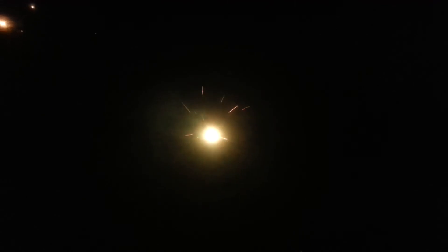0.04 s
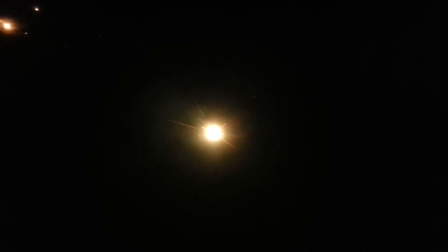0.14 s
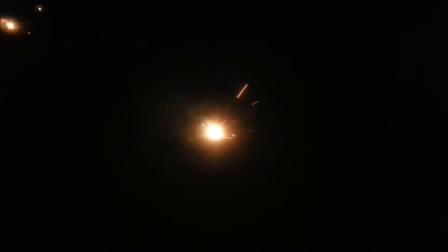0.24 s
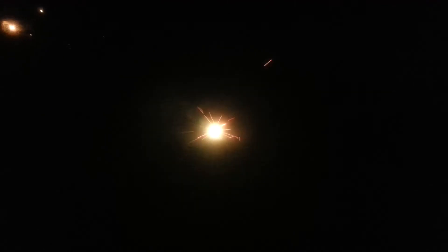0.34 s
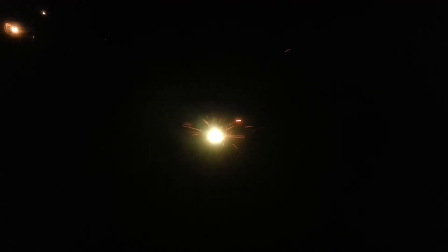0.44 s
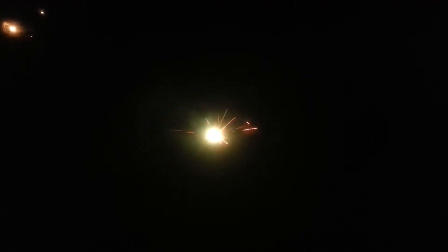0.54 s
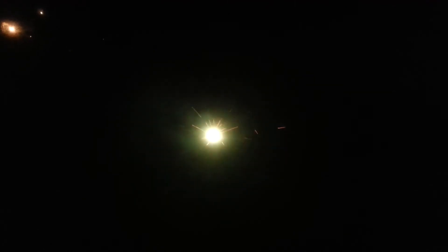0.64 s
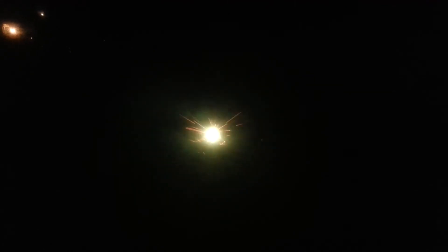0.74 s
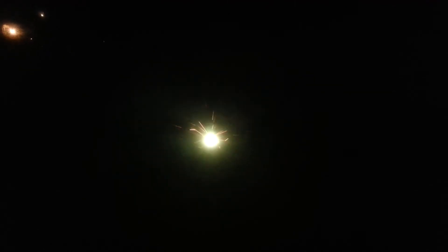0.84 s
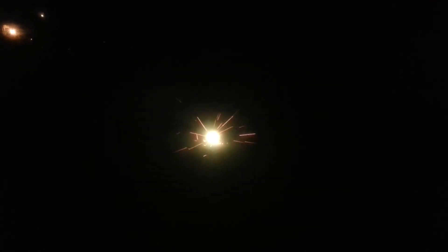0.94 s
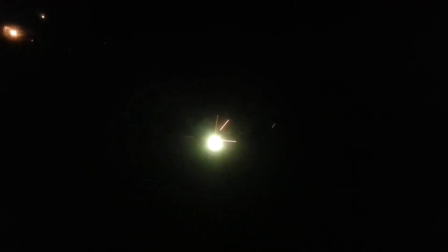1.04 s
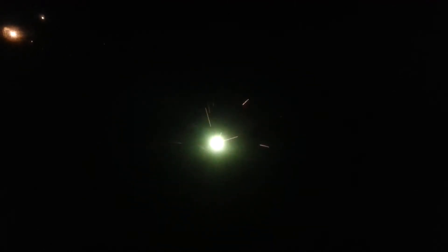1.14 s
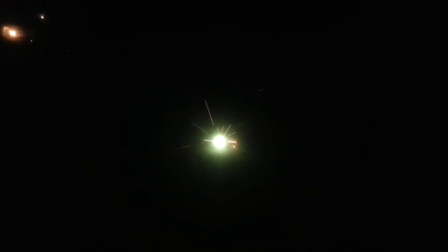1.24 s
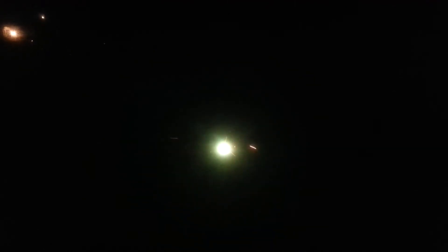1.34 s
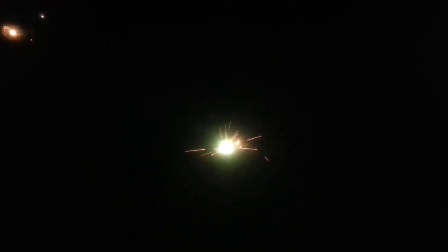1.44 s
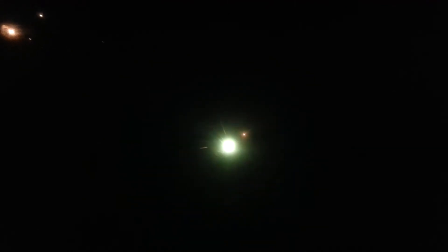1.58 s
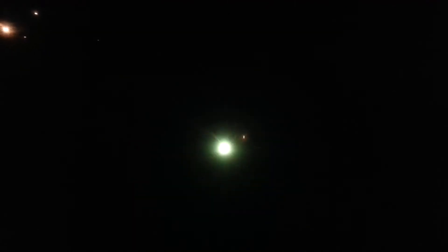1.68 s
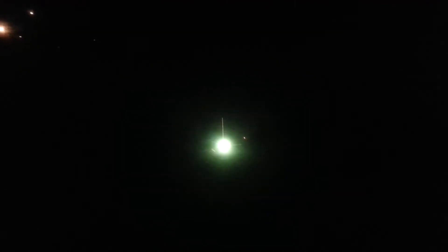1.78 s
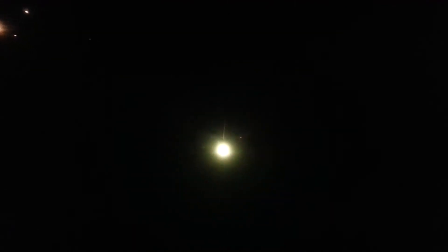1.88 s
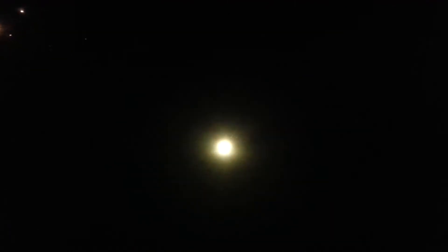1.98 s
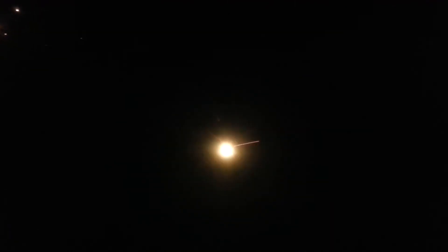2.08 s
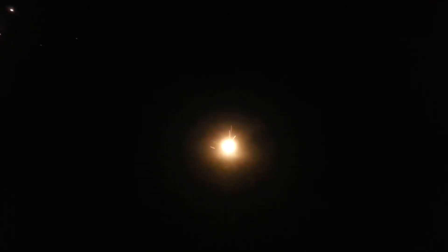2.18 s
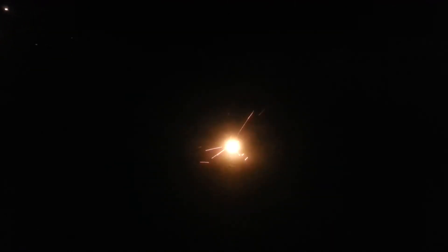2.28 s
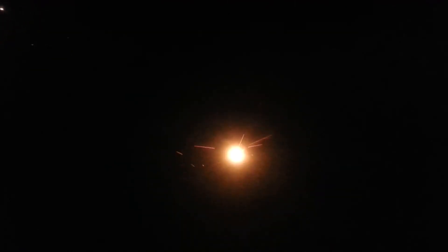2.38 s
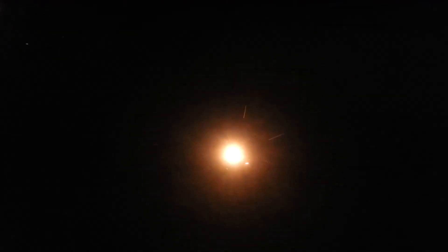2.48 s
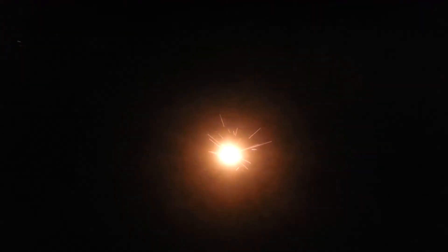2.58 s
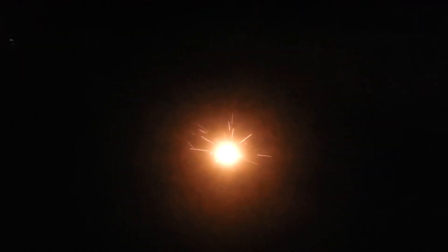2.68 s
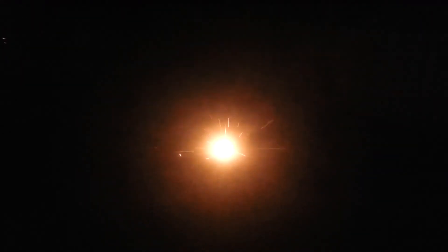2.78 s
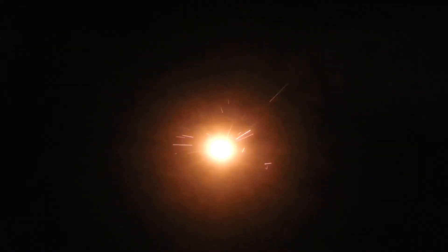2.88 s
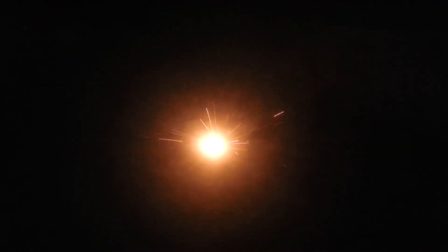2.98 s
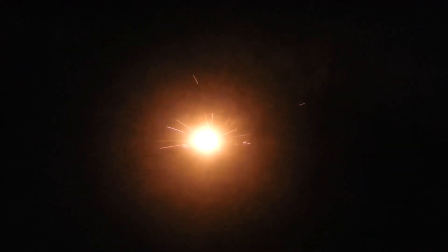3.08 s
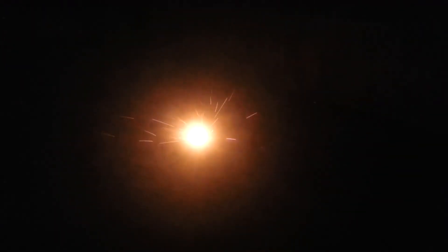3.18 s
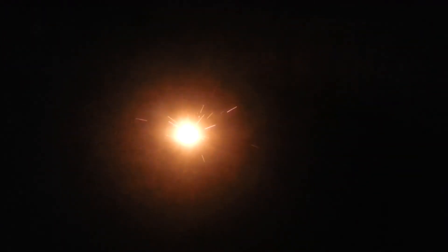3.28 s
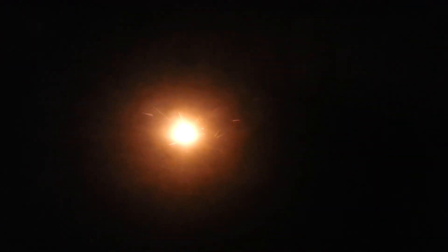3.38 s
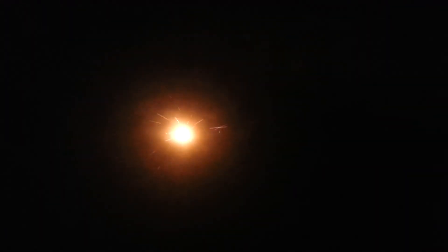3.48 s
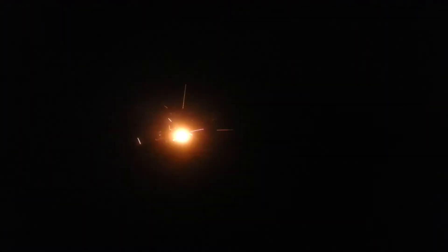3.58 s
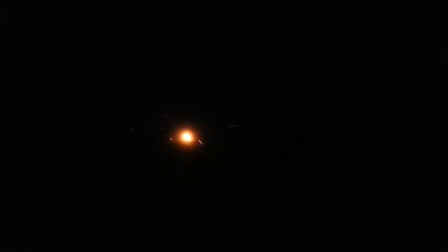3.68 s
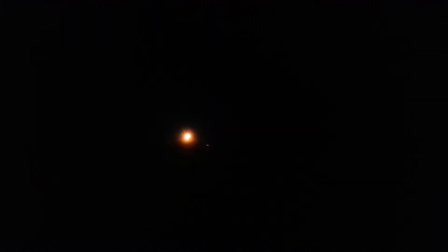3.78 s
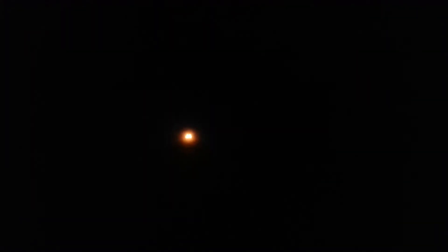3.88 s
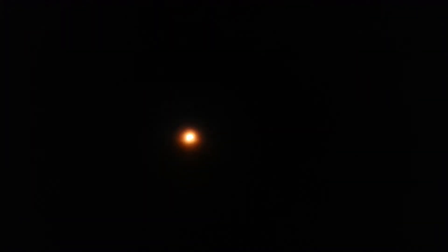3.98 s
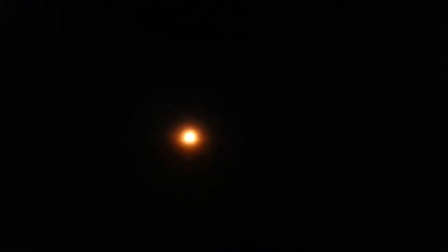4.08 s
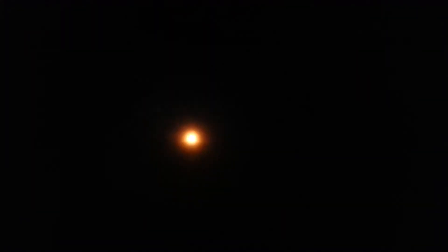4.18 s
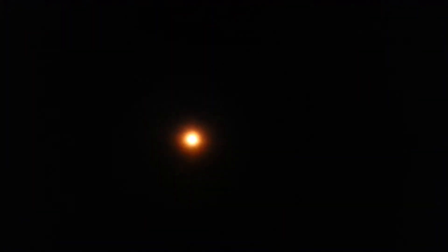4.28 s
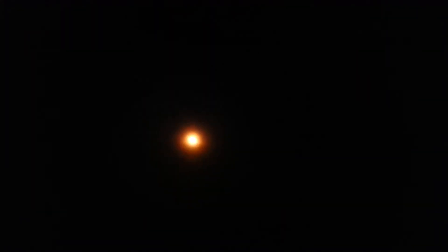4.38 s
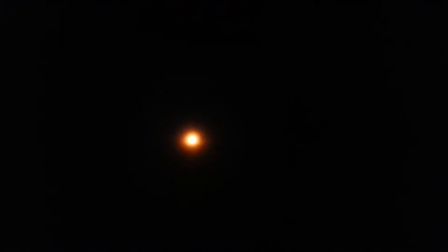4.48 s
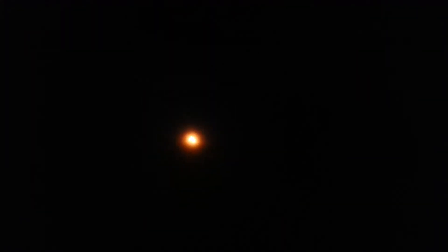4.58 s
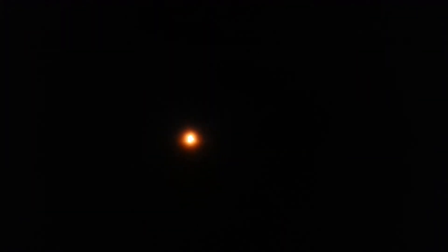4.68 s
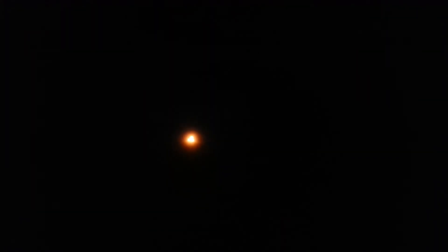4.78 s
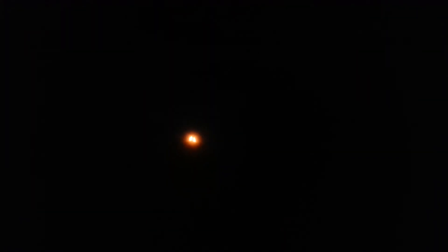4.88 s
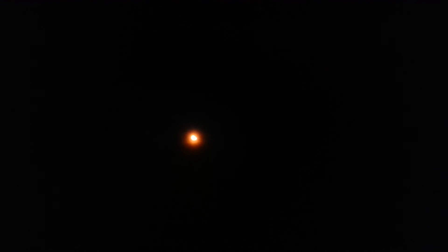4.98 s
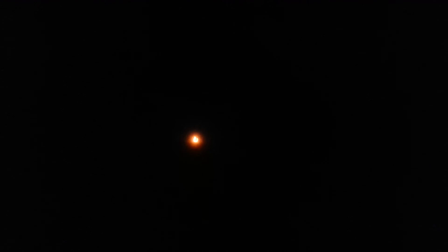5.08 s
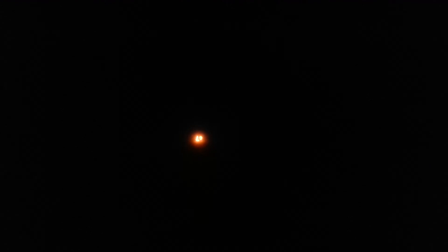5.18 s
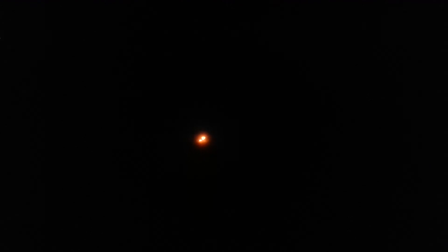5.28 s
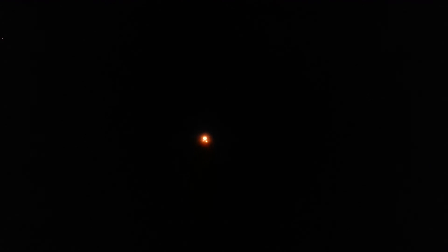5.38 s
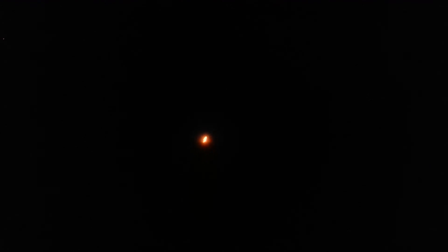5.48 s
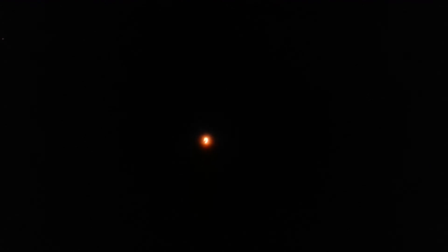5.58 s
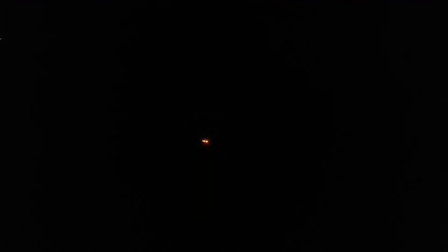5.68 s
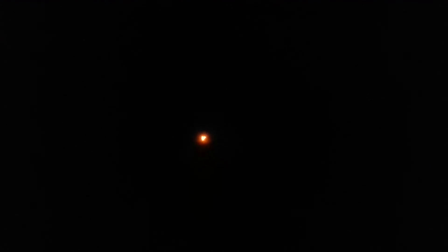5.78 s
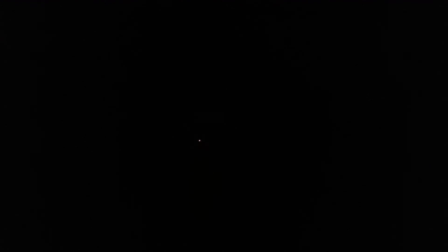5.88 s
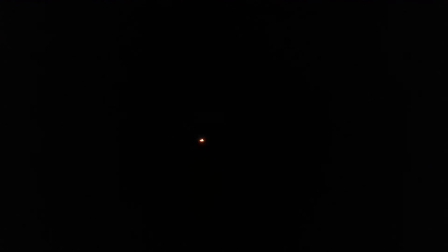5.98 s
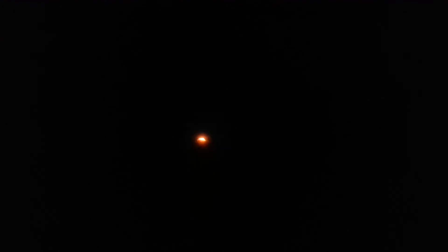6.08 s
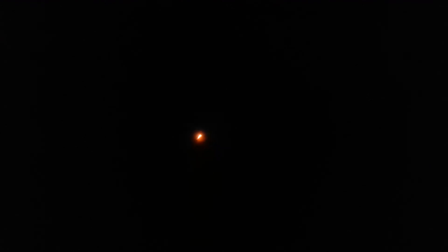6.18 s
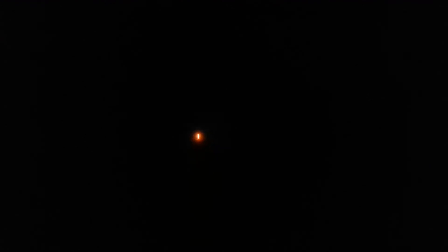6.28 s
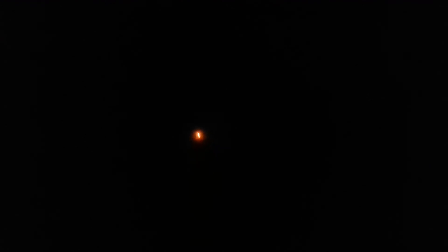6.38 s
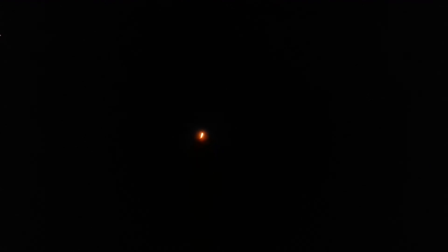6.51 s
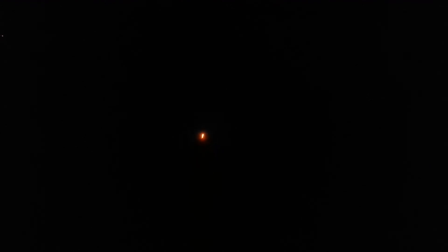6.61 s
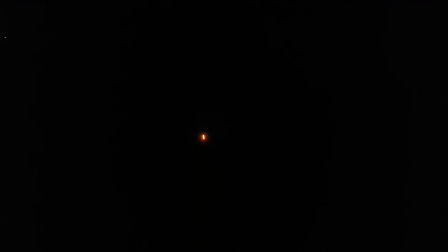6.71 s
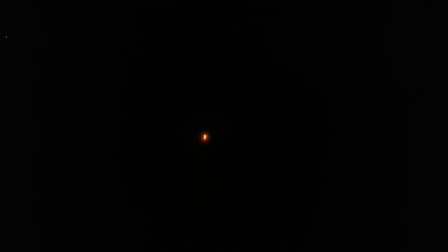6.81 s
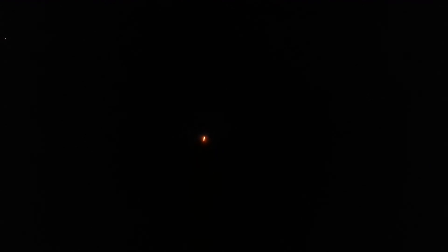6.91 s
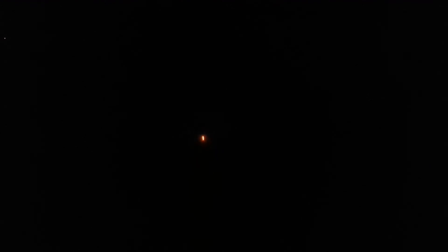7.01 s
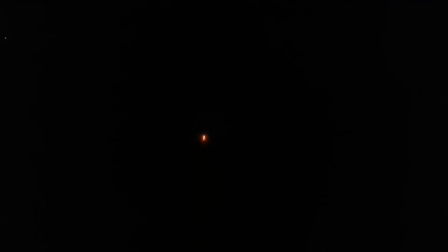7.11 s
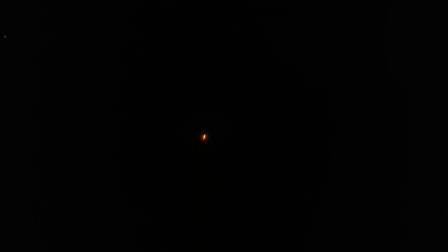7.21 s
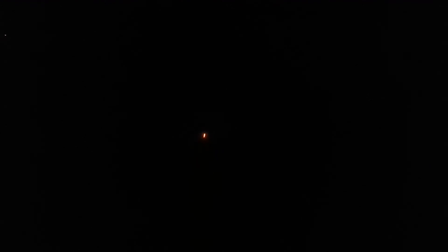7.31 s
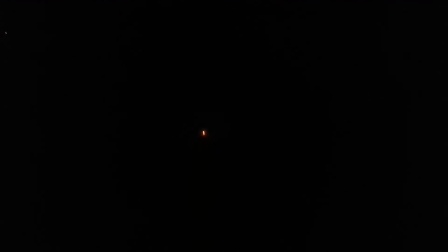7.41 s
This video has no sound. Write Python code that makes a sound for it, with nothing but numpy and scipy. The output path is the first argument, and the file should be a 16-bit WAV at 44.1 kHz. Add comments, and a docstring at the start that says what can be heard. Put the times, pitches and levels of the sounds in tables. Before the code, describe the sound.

A ground firework hisses and sputters nearby at night, surging as shell bursts crack and echo between houses, then chuffs out in single spits.

```python
"""Ground firework at night

A ground firework spins, hisses, surges and flares, then chuffs out in single spits: shaped noise gated by spurts.
Three strong shell bursts and three fainter ones, pressure pulses with scatter, echo between house fronts.
Behind them lie a rumble of distant fireworks (slowly swelling noise) and a faint motor that winds down
(a sine of falling pitch); short sines give three rings of the spits and one hollow knock, impulses two clicks."""
import sys
import numpy as np
from scipy import signal
from scipy.fft import rfft, irfft, next_fast_len
from scipy.io import wavfile
from scipy.ndimage import uniform_filter1d, map_coordinates

SR = 44100
rng = np.random.default_rng(int(sys.argv[2]) if len(sys.argv) > 2 else 0)


def store_wav(level_fs):
    """Save 16-bit WAV to argv[1]."""
    pcm = np.round(np.clip(np.atleast_2d(level_fs), -1, 1) * 32767)
    wavfile.write(sys.argv[1], SR, pcm.T.astype(np.int16))


N = 328538

# Left-right correlation of far sounds: (frequency [Hz], correlation [0-1])
FAR_CORRELATION = [(60, 0.43), (200, 1), (600, 0.59), (1200, .05), (8000, .03)]
# Decay of the short echo between house fronts: (frequency [Hz], time to fall 60 dB [s])
FRONTS_T60 = [(80, 0.243), (250, 0.87), (600, 0.37), (2000, 0.37), (8000, 0.14)]
# The jet swings round unevenly: (time [s], direction [negative turned away, positive facing us])
JET_FACING = [(0, -0.31), (.1, -0.42), (.18, 0.34), (.27, -0.43), (.34, 0.89), (.44, 0.92), (.49, -0.82),
              (.68, -0.79), (.74, 0.7), (.84, 0.36), (.89, -0.83), (.97, 0.34), (1.09, 0.32), (1.15, -0.69),
              (1.21, 0.99), (1.27, -0.6), (1.33, .6), (1.39, -0.44), (1.57, -0.35), (1.67, 0.83),
              (1.75, -0.65), (1.8, .5), (1.89, 1), (1.96, -.6), (2.06, 0.59), (2.15, -0.062), (2.2, 0.56),
              (2.3, -0.67), (2.44, -1.3), (2.51, 0.28), (2.57, -0.75), (2.76, -0.17), (2.81, 0.93),
              (2.89, 0.76), (2.94, -.6), (3.02, -0.06), (3.12, 0.0042)]


def amp(db):
    """Level to amplitude: every 20 dB is a factor of ten."""
    return 10 ** (np.asarray(db) / 20)


def unit(x):
    """Normalization to a root-mean-square of 1."""
    return x / np.sqrt(np.mean(x ** 2) + 1e-20)


def along(points, hz):
    """Interpolation of (frequency [Hz], value) points on a logarithmic frequency axis."""
    f, v = np.transpose(points)
    return np.interp(np.log(hz + 1), np.log(f + 1), v)


def curves(rows):
    """Linear interpolation in time: one value per sample for each column after the time."""
    s, *columns = np.transpose(rows)
    return [np.interp(np.arange(N) / SR, s, column) for column in columns]


def wobble(rate):
    """Slow random modulation: a smooth curve through random knots, rate of them per second."""
    knots = rng.standard_normal(int(N * rate / SR) + 4)
    return map_coordinates(knots, [np.arange(N) * rate / SR])


def swell(start, length, attack, release):
    """Envelope from 0 to 1: a straight rise and a hold, then exponential relaxation."""
    t = np.arange(N) / SR - start
    return np.clip(t / attack, 0, 1) * np.exp(-np.clip((t - length) / release, 0, 20))


def filtered(x, response):
    """Linear filtering: the spectrum of x times a complex response of frequency."""
    size = next_fast_len(N + SR // 2)
    spectrum = rfft(x, size) * response(np.fft.rfftfreq(size, 1 / SR))
    return irfft(spectrum, size)[..., :N]


def pulse(spectrum, size=4096):
    """Minimum phase: the causal pulse of peak 1 with this spectrum, found by folding its cepstrum."""
    cepstrum = irfft(np.log(amp(along(spectrum, np.fft.rfftfreq(size, 1 / SR)))))
    shape = irfft(np.exp(rfft(2 * cepstrum[:size // 2], size)))
    return shape / np.abs(shape).max()


def rush(spectrum, correlation, patchy_db, size=8):
    """Turbulent noise: stereo, rms 1, with random gain patches of size frames in time."""
    noise = rng.standard_normal((2, N), dtype=np.float32)
    z = signal.stft(noise, nperseg=512)[2]
    field = uniform_filter1d(rng.standard_normal(z.shape[1:]), size=6, axis=0)
    field = uniform_filter1d(field, size=size, axis=1)
    patches = amp(patchy_db * unit(field)).astype(np.float32)
    pair = signal.istft(z * patches, nperseg=512)[1][:, :N]

    def mid_side_response(hz):
        likeness = np.clip(along(correlation, hz), -1, 1)
        return amp(along(spectrum, hz)) * np.sqrt(1 + np.outer([1, -1], likeness))

    mid, side = filtered(pair, mid_side_response)
    return unit(np.array([mid + side, mid - side]))


def placed(pair, lead_ms, right_db):
    """Stereo localization: the right microphone hears a source earlier and right_db louder."""
    shift = lead_ms * SR / 1000
    left = map_coordinates(pair[0], [np.arange(N) - shift], order=5)
    return np.array([left * amp(-right_db / 2), pair[1] * amp(right_db / 2)])


def motor():
    """Frequency modulation: a faint hum slides down in pitch as the motor slows, and fades."""
    fast_hz, slow_hz, halfway_s, steepness = 201, 78, 2.37, 3.1
    start_db, fade_db_per_s = -44, 3.5
    stops_s, stop_db_per_s = 3.6, 9  # extra fade from here on
    t = np.arange(N) / SR
    hz = slow_hz + (fast_hz - slow_hz) / (1 + (t / halfway_s) ** steepness)
    phase = 2 * np.pi * np.cumsum(hz * (1 + 0.011 * wobble(9))) / SR
    level_db = start_db - fade_db_per_s * t - stop_db_per_s * np.maximum(t - stops_s, 0)
    return amp(level_db + 2.2 * wobble(8.9)) * np.sin(phase)


def town():
    """Superposition: far fireworks merge into a restless rumble; the microphones hiss."""
    # Spectra of the rumble and its deep part: (frequency [Hz], relative density [dB])
    town_spectrum = [(25, -60), (50, -47.5), (100, -17), (150, -3), (240, -1.5), (335, -2), (400, -6.5),
                     (500, -7), (620, -3.5), (1000, -8), (1400, -16), (2200, -23.5), (5500, -31.5),
                     (14000, -39)]
    deep_spectrum = [(20, -25), (45, -20), (75, -6), (100, -4), (150, -18), (300, -32.5)]
    # (time [s], relative rumble level [dB], relative deep level [dB])
    rumble_levels = [(0, -50, -69), (.8, -42.5, -83), (1.8, -49.5, -96), (2.75, -47.5, -85),
                     (3.1, -43, -62), (4.5, -45, -74), (4.63, -43, -68), (4.78, -45, -66),
                     (5.03, -48, -63.5), (5.45, -43.5, -62.5), (6.02, -46.5, -72), (6.22, -48, -71),
                     (6.6, -47, -66), (7.0, -47, -69.5), (7.45, -48.5, -65)]
    # Far booms swell the rumble: (start [s], length [s], gain [dB])
    rolls = [(5.412, .04, 2), (5.61, 0.15, 1), (6.109, 0.047, 2), (6.205, 0.082, 2.5), (6.968, .08, 1)]
    roll_attack_s, roll_release_s = 0.021, 0.03
    rumble_db, deep_db = curves(rumble_levels)
    for s, length, db in rolls:
        rumble_db = rumble_db + db * swell(s, length, roll_attack_s, roll_release_s)
    rumble = amp(rumble_db + 2.5 + 0.233 * wobble(7.0)) * rush(town_spectrum, FAR_CORRELATION, patchy_db=0.93)
    deep = amp(deep_db + 5.5) * rush(deep_spectrum, FAR_CORRELATION, patchy_db=2.5)
    hiss_spectrum = [(300, 2), (6500, -8.0), (11000, -1.0), (15000, -2.0)]
    hiss = amp(-60.0) * rush(hiss_spectrum, FAR_CORRELATION, patchy_db=-2.0)
    dulled = filtered(rumble, lambda hz: 1 / (1 + (hz / 6000) ** 2))
    return placed(dulled, lead_ms=0.2, right_db=-0.5) + deep + hiss


def ticks():
    """Impulses: two thin clicks in the quiet at the end, through a first-order high-pass."""
    # (time [s], relative level [dB])
    tick_list = [(5.7019, -37.5), (6.9842, -37.5)]
    clicks = np.zeros(N)
    for s, db in tick_list:
        clicks[round(s * SR)] = amp(db + 9.0)
    return filtered(clicks, lambda hz: 1j * hz / (3500 + 1j * hz))


def street(x, decay, build):
    """Reverberation: an echo among houses builds up, then each frequency decays at its own speed."""
    hz, t, z = signal.stft(rng.standard_normal((2, 2 * SR)), SR, nperseg=256)
    turn = np.arccos(np.clip(along(FAR_CORRELATION, hz), -1, 1))[:, None] / 2
    mid, side = z[0] * np.cos(turn), z[1] * np.sin(turn)
    fade = amp(-60 * t / along(decay, hz)[:, None]) * (1 - np.exp(-t / build))
    tail = signal.istft(np.array([mid + side, mid - side]) * fade, SR, nperseg=256)[1]
    return signal.fftconvolve(x, tail / np.linalg.norm(tail[0]), axes=1)[:, :N]


def shells():
    """Specular and diffuse reflection: a pulse and its wall echoes, each with scatter, then the street's tail."""
    # (time [s], relative level [dB], wall echo gain [dB], tail gain [dB], right microphone's lead [ms],
    # echo path factor [-], bass gain [dB], knock gain [dB], treble gain [dB])
    shell_list = [(0.3112, -6.5, -7, -0.5, 0.18, .9, 1.5, 0, 0.5), (.522, -50, -3, -5, .1, 1, 2, 0, 0.5),
                  (2.829, -11, -1, 1.5, 0.22, 1.04, 4, 3, 5.5),
                  (5.079, -17.5, 7, 3.5, 0.27, 1.06, 0.5, -1, -1),
                  (6.8579, -30, -13, -3, 0.18, 1, 6, -3, -6), (6.892, -34, -14, -7, .14, 1, 4, 0, -6)]
    # House fronts repeat every burst: (delay at path factor 1 [ms], relative level [dB])
    walls = [(4.8, -2), (13, 4), (18.5, -4.5), (28.5, -8), (58, -25.5), (96, -10)]
    # Spectrum of the pressure pulse: (frequency [Hz], relative level [dB])
    boom_spectrum = [(25, -47.5), (60, -26), (110, -9), (150, -2.5), (240, 1.5), (300, 0.5), (365, -2),
                     (470, -6.5), (620, 0.5), (720, -2.5), (880, -10.5), (1100, -7), (1450, -15.5),
                     (1900, -16.5), (2800, -29), (4000, -45), (8000, -68.5)]
    # Decay of the long echo down the street: (frequency [Hz], time to fall 60 dB [s])
    street_t60 = [(80, 1.5), (250, 4.2), (800, 1.27), (3000, 1.8), (8000, 0.6)]
    scatter_db, scatter_t60_s = 3, 0.12  # the rough trail behind every arrival
    scatter_above_hz = 260  # longer waves bounce off the walls cleanly
    fronts_db, street_db = -15.5, -20  # short and long tails, before each burst's own tail gain
    t = np.arange(SR // 4) / SR
    out = np.zeros((2, N + 3 * SR))
    rough = signal.butter(1, scatter_above_hz, "high", fs=SR, output="sos")
    for s, db, echo_db, tail_db, lead_ms, detour, bass_db, knock_db, treble_db in shell_list:
        arrivals = np.zeros((2, SR // 2))
        paths = [(0.048, 0)]  # direct sound: delay [ms], level [dB]
        paths += [(ms * detour, wall_db + echo_db) for ms, wall_db in walls]
        for delay_ms, path_db in paths:
            scatter = signal.sosfilt(rough, rng.standard_normal(len(t))) * amp(-60 * t / scatter_t60_s)
            blow = amp(scatter_db) * scatter / np.linalg.norm(scatter)
            blow[0] += 1
            for ear, late_ms in enumerate([delay_ms + abs(lead_ms), delay_ms]):
                at = round(late_ms * SR / 1000)
                arrivals[ear, at:][:len(t)] += amp(db + path_db) * blow
        tone = [(200, bass_db), (600, knock_db), (1300, treble_db)]
        boom = pulse([(hz, level + along(tone, hz)) for hz, level in boom_spectrum])
        direct = signal.fftconvolve(arrivals, boom[None], axes=1)
        short_tail = amp(fronts_db) * street(direct, FRONTS_T60, build=0.0112)
        long_tail = amp(street_db) * street(direct, street_t60, build=0.1)
        for part in direct, amp(tail_db) * (short_tail + long_tail):
            out[:, round(s * SR):][:, :part.shape[1]] += part
    return out[:, :N]


def knock_and_rings():
    """Resonance: one hollow knock at 640 Hz and three short 2400 Hz rings of the spits, as Gaussian tone bursts."""
    # (time [s], frequency [Hz], envelope peak [dB], half width to 1/e [s])
    tone_bursts = [(6.7725, 640, -38.5, .008), (4.8705, 2400, -28.5, .0012), (4.9068, 2400, -43, .0025),
                   (4.9236, 2400, -43, .002)]
    t = np.arange(N) / SR
    out = np.zeros(N)
    for s, hz, db, width in tone_bursts:
        envelope = amp(db) * np.exp(-((t - s) / width) ** 2)
        out += envelope * np.sin(2 * np.pi * hz * (t - s))
    return out


def puff(life):
    """Transient gas flow: power of one spurt, a quick swell to 1 at life seconds, then a decay."""
    u = np.arange(SR // 20) / SR / life
    return (u * np.exp(1 - u)) ** 4


def spurts(rate, scatter, size_db, life):
    """Pulsating flow: power (mean 1) of a train of uneven spurts at a changing rate."""
    turns = np.cumsum(rate) / SR
    chance = rng.standard_normal((2000, 2))[:int(turns[-1])]
    turn_at = np.arange(len(chance)) + scatter * chance[:, 0]
    at = np.interp(turn_at, turns, np.arange(N)).astype(int)
    limited = 2 * np.tanh(chance[:, 1] / 2)
    sizes = amp(size_db * limited) ** 2 / rate[at]  # a denser train has weaker spurts
    power = np.abs(signal.fftconvolve(np.bincount(at, sizes, N), puff(life))[:N])
    return power / power.mean()


def spits():
    """Impulsive gas release: strengths, bright and low, of bigger single spurts, each with a faint soft skirt."""
    # (time [s], relative level [dB], low body relative to that [dB])
    spit_list = [(0.279, -15, -1), (0.793, -4, -16), (1.902, -13.5, -31), (2.151, -20.5, -2.5),
                 (2.559, -9, -17.5), (2.8667, -3, -27), (2.9225, -7.5, -24.5), (2.932, 0, -19),
                 (2.9668, -5.5, -15.5), (3.0354, -5.5, -15), (3.056, -6, -12), (3.865, -38, 4.5),
                 (3.877, -28, -7), (3.959, -14.5, -16), (3.975, -15.5, -4.5), (3.988, -17.5, -15),
                 (4.013, -24, 1.5), (4.042, -16, -11), (4.061, -25.5, -9), (4.075, -16, -21),
                 (4.101, -17.5, -11), (4.117, -16.5, -12.5), (4.137, -19, -6), (4.15, -16, -2.5),
                 (4.168, -19.5, -16), (4.193, -18.5, -4.5), (4.209, -14, -8.5), (4.223, -20.5, -17.5),
                 (4.244, -18, -7.5), (4.257, -20, -3), (4.275, -28, 2), (4.29, -17.5, -8.5),
                 (4.304, -18, -7.5), (4.317, -21, -10), (4.336, -17.5, -10.5), (4.352, -22, -13.5),
                 (4.3712, -16, -4), (4.4205, -15.5, -7), (4.44, -30, -2), (4.454, -21.5, -8),
                 (4.47, -17.5, -9.5), (4.488, -26, -2.5), (4.507, -17, -6), (4.524, -26, 2.5),
                 (4.56, -28, 0), (4.5794, -33, 6), (4.592, -31, 1), (4.6118, -27, 1), (4.632, -37.5, 9),
                 (4.6647, -33.5, 4), (4.687, -28.5, 1.5), (4.7002, -34, -7), (4.711, -45, -3),
                 (4.788, -41, 3), (4.81, -39, 4), (4.8682, -27.5, 1), (4.8818, -36, -10), (4.9214, -42, -3),
                 (4.9367, -30, -0.5), (4.95, -40, 4), (4.9576, -30, 1), (4.973, -37, -1),
                 (5.1237, -30, -13), (5.153, -35, -5), (5.259, -36.5, -5), (5.385, -42.5, 4),
                 (5.415, -45, 3), (5.442, -53, 8), (5.583, -34, -12), (5.6, -44, -7)]
    peak_s, width_s = 0.0026, 0.0015  # time to the peak; half width to 1/e of the power
    skirt_db, skirt_s = -14, 0.0048  # weak skirt on both sides of the peak
    bright, low = np.zeros(N), np.zeros(N)
    for s, db, body_db in spit_list:
        at = round((s + peak_s) * SR)
        bright[at] = amp(db - 11.5) ** 2
        low[at] = amp(db + body_db - 5.5) ** 2
    t = np.arange(-SR // 20, SR // 20) / SR
    shape = np.exp(-(t / width_s) ** 2) + amp(skirt_db) ** 2 * np.exp(-np.abs(t) / skirt_s)
    return [np.sqrt(np.abs(signal.oaconvolve(kicks, shape, "same"))) for kicks in (bright, low)]


def burn():
    """Source modulation: relative levels [dB] of hiss, sputter and roar, and the surges' share of the hiss."""
    # The slow burn: (time [s], relative jet hiss [dB], relative sputter [dB], relative flame roar [dB])
    burn_levels = [(0, -33.5, -32, -37), (1.7, -33, -31.5, -36.5), (2.33, -35, -31.5, -39),
                   (2.72, -29.5, -25, -31.5), (2.95, -28.5, -27.5, -29), (3.45, -32.5, -27, -34),
                   (3.8, -40, -34, -32.5), (4.0, -45, -35, -33.5), (4.23, -51.5, -37.5, -36),
                   (4.52, -66, -44, -36.5), (4.72, -72.5, -53.5, -54)]
    # The flame surges: (start [s], length [s], hiss gain [dB], sputter gain [dB], roar gain [dB])
    surges = [(0.063, .05, -2, 4.5, 1), (0.25, 0.11, 3, 7.5, 7), (0.32, .03, 1.5, 2.5, -3),
              (0.364, 0.1, -1.5, 2.5, 3), (0.47, 0.14, -1.5, 2, 0), (0.721, 0.045, -2, 3.5, -0.5),
              (0.769, 0.064, 4, 6, 4.5), (0.866, 0.1, -0.5, 3, 3), (0.956, 0.11, -1.5, 4.5, -2),
              (1.2, 0.069, 4, 9.5, 4), (1.297, 0.042, -1.5, 7, 1), (1.382, 0.021, -1, 1.5, 5.5),
              (1.514, 0.12, 0, -1.5, 2.5), (1.537, 0.037, -1, 8.5, -2), (1.784, 0.041, -0.5, 3, 1),
              (2.133, 0.026, 0, 2, 5), (2.24, 0.092, 1.5, 5.5, -1.5), (2.823, 0.049, 2, 3.5, 3.5),
              (3.027, 0.049, -1.5, 2, -1.5), (3.144, 0.043, 0, 5.5, 3.5), (3.241, 0.043, 1.5, 5, 5.5),
              (3.355, 0.051, 3, 6, 6)]
    attack_s, hiss_release_s, release_s = 0.02, 0.054, 0.016
    spin_sizzle_db, spin_roar_db = 1.76, -1.3  # facing us it sizzles more and roars less
    waver_per_s, sizzle_waver_db, roar_waver_db = 16, 0.5, 0.42  # the uneven burn
    jet_db, sputter_db, flame_db = curves(burn_levels)
    facing, = curves(JET_FACING)
    choke_db = -11 * swell(3.772, 0.038, attack_s, release=0.0031)  # the flame chokes once
    sputter_db = sputter_db + spin_sizzle_db * facing + sizzle_waver_db * wobble(waver_per_s)
    sputter_db = sputter_db + 0.76 * choke_db
    flame_db = flame_db + spin_roar_db * facing + roar_waver_db * wobble(waver_per_s) + choke_db
    rise_db = 0
    for s, length, hiss_db, sizzle_db, roar_db in surges:
        surge = swell(s, length, attack_s, release_s)
        rise_db = rise_db + hiss_db * swell(s, length, attack_s, hiss_release_s)
        sputter_db = sputter_db + sizzle_db * surge
        flame_db = flame_db + roar_db * surge
    return jet_db + rise_db, sputter_db, flame_db, rise_db


def whistling(hz):
    """Resonance: gain of the nozzle's narrow peaks, added in power to the hiss."""
    # (frequency [Hz], width [Hz], level over the hiss [dB])
    whistles = [(6800, 46, -4), (8310, 90, -4), (11000, 50, -2), (13240, 25, -1.5), (14070, 30, -0.5)]
    peaks = sum(amp(db) ** 2 / (1 + (2 * (hz - centre) / width) ** 2) for centre, width, db in whistles)
    return np.sqrt(1 + peaks)


def firework():
    """Jet noise: gas leaves the nozzle as a smooth hiss and in spurts that drive a sizzle and a roar."""
    # The nozzle burns wider: (time [s], spurts per second [1/s], relative share of sound in spurts [0-1],
    # relative hollow tube tone [dB], base share of the shrill sizzle [0-1])
    nozzle = [(0, 182, 0.87, -11.5, 0.43), (2.0, 178, 0.8, -5.5, 0.55), (3.1, 122, 0.72, -15, 0.22),
              (3.95, 105, 0.7, -1.5, 0.15), (4.25, 90, 0.7, -3, 0.07), (4.6, 66, 0.9, -17.5, 0)]
    # Left-right correlation of the near sound: (frequency [Hz], correlation [0-1])
    near_correlation = [(300, 0.7), (700, 1), (1300, 0.3), (2500, 0.68), (4600, 0.74), (6500, 0.45),
                        (12000, 0.3)]
    # Spectra of hiss, dull and shrill sizzle, roar and hollow tube: (frequency [Hz], relative density [dB])
    jet_spectrum = [(100, -71), (1000, -38), (3000, -5.5), (5500, 5.5), (6600, 5), (7100, 0.5), (8300, 5),
                    (9500, 3), (10800, 3), (11800, 1), (13200, 4), (14400, -5)]
    sputter_spectrum = [(1500, -52), (3000, -9), (3700, -8.5), (4300, 0), (4950, -1.5), (5500, -13.5),
                        (6200, -24.5), (7100, -23), (10000, -24), (15000, -53)]
    shrill_spectrum = [(2500, -54), (3900, -7.5), (4500, 2.5), (5050, 4), (5600, -1.5), (6500, -2.5),
                       (7200, -12), (10000, -16.5), (15000, -37.5)]
    flame_spectrum = [(30, -76.5), (60, -45), (120, -14), (220, -4.5), (400, -5.5), (600, -9), (1250, 1),
                      (1650, -1), (2450, 2.5), (3300, -1), (4300, -4), (7000, -15.5), (15000, -47)]
    tube_spectrum = [(120, -43), (330, -6), (600, 4), (800, -0.5), (1100, -10.5), (2500, -35)]
    spent_s, cooling_db_per_s = 4.34, 19  # the spent tube fades away
    spin_shrill, spit_shrill = 0.75, 0.15  # facing us, and in a spit, the sizzle turns shriller
    grit_per_s, grit_db = 700, 1.8  # fine grit in the sizzle
    grit_from_s, grit_full_s = 2.8, 4.1  # the starving flame turns gritty
    t = np.arange(N) / SR
    jet_db, sputter_db, flame_db, rise_db = burn()
    rate, share, tube_db, shrill = curves(nozzle)
    share = share * amp(-0.8 * np.maximum(rise_db, 0))  # in a strong surge the spurts merge
    # scatter is a share of the period; life is in seconds
    power = spurts(np.maximum(rate, 10), scatter=0.18, size_db=2.5, life=0.0022)
    cooling = amp(-cooling_db_per_s * np.maximum(t - spent_s, 0))

    def gate(part):
        return cooling * np.sqrt(1 + np.clip(part * share, 0, 1) * (power - 1))

    hiss = unit(filtered(rush(jet_spectrum, near_correlation, patchy_db=2.0), whistling))
    jet = amp(jet_db + 4.5) * gate(0.36) * hiss

    facing, = curves(JET_FACING)
    shrill = np.clip(shrill * (1 + 0.17 * wobble(11)) + spin_shrill * facing, 0, 1)
    dull = rush(sputter_spectrum, near_correlation, patchy_db=2, size=3)
    keen = rush(shrill_spectrum, near_correlation, patchy_db=2.0, size=3)
    bright_spits, low_spits = spits()
    grit_depth = np.interp(t, [grit_from_s, grit_full_s], [0, 1])
    grit = amp(grit_db * grit_depth * (wobble(grit_per_s) + 0.2))
    steady = amp(sputter_db + 0.3) * gate(0.56) * grit
    strength = np.hypot(steady, bright_spits) + 1e-12
    keen_part = np.clip(shrill + spit_shrill * (bright_spits / strength) ** 2, 0, 1)
    sizzle = strength * (np.sqrt(1 - keen_part) * dull + np.sqrt(keen_part) * keen)

    flame = amp(flame_db + 0.9) * gate(0.53 * share)  # the roar chuffs too
    roar = np.hypot(flame, low_spits) * rush(flame_spectrum, near_correlation, patchy_db=1.5, size=3)
    hollow = flame * amp(tube_db - 4) * rush(tube_spectrum, near_correlation, patchy_db=2, size=3)
    # high-pass near 95 Hz: the near sound has little bass
    return filtered(jet + sizzle + roar + hollow, lambda hz: 1 - 1 / (1 + (hz / 95) ** 4))


def pavement(x, strength, dull_hz):
    """Interference: a delayed ground bounce combs the sound; rough stone scatters its treble away."""
    bounce_ms = 1.598

    def response(hz):
        delay = np.exp(-2j * np.pi * hz * bounce_ms / 1000)
        return 1 + strength / (1 + (hz / dull_hz) ** 4) * delay

    return filtered(x, response)


def ports(hz):
    """Transfer function: the two microphone ports differ a little in level and phase."""
    # (frequency [Hz], right over left [dB])
    right_louder = [(600, 0.5), (1200, 2.5), (2600, -1.5), (5000, 2.5), (9000, 0.9), (13000, 1.7)]
    # (frequency [Hz], phase by which the left microphone leads [rad])
    port_phase = [(1200, -0.1), (4000, 0.49), (5340, 0.4), (6200, 0), (6980, 1.0), (7750, 0.4),
                  (8270, 0.89), (9650, -0.26), (10800, -0.1), (12800, 1.2), (15000, 0.2)]
    sides = np.array([[-.5], [.5]])
    return amp(sides * along(right_louder, hz)) * np.exp(-1j * sides * along(port_phase, hz))


def scene():
    """Superposition of the near firework, a little to the right, with the shells and the town behind it."""
    # The firework shifts sideways: (time [s], right microphone's lead [ms])
    drift = [(2.9, 0.0018), (3.6, 0.054)]
    lead_ms, = curves(drift)
    near = pavement(firework(), strength=0.15, dull_hz=6820)
    near = filtered(placed(near, lead_ms, right_db=0.5), ports)
    near_echo = amp(-15.0) * street(near, FRONTS_T60, build=0.00417)
    return near + near_echo + ticks() + shells() + knock_and_rings() + town() + motor()


def record(dry):
    """Band limitation: an ideal low-pass keeps nothing above its edge."""
    top_hz = 14650
    return filtered(dry, lambda hz: hz < top_hz)


dry = scene()
out = record(dry)
store_wav(out)
```